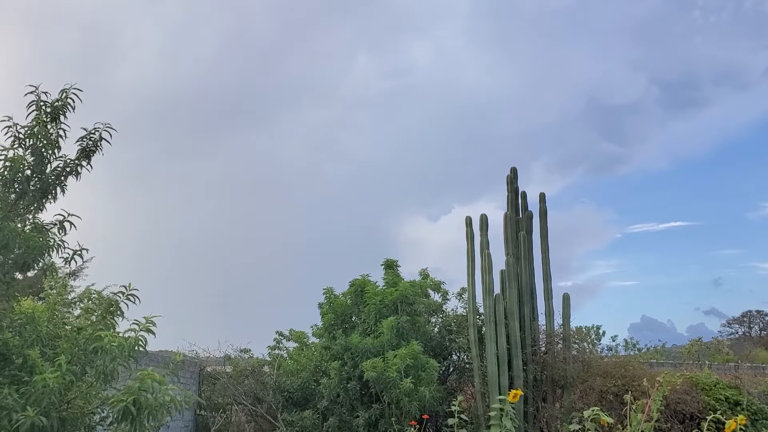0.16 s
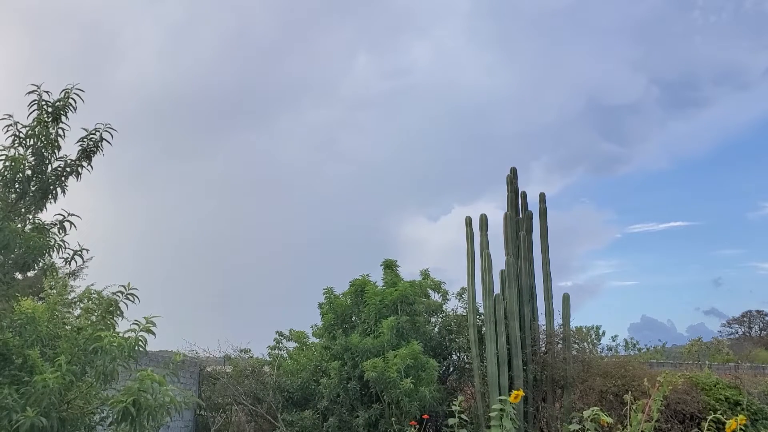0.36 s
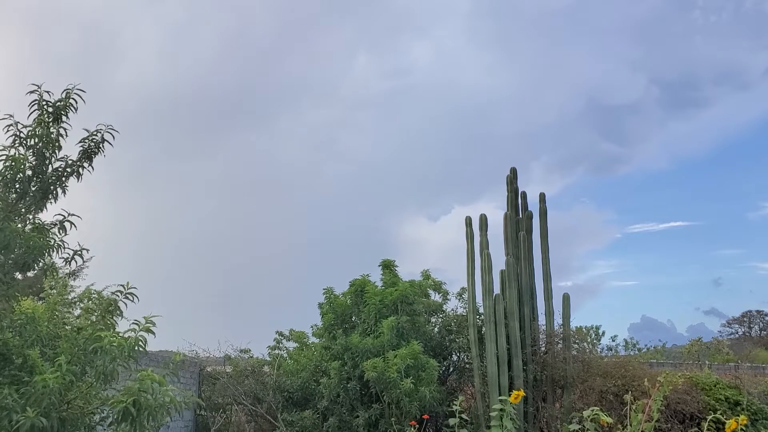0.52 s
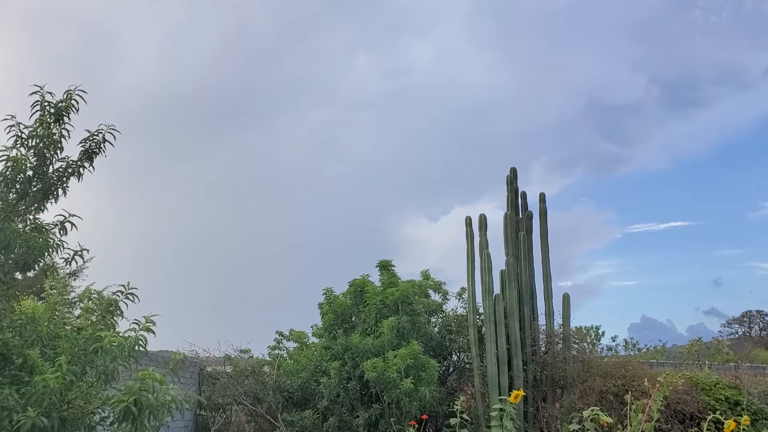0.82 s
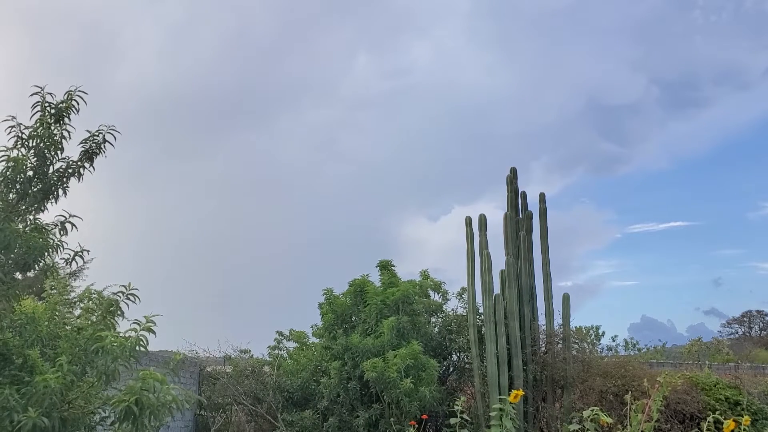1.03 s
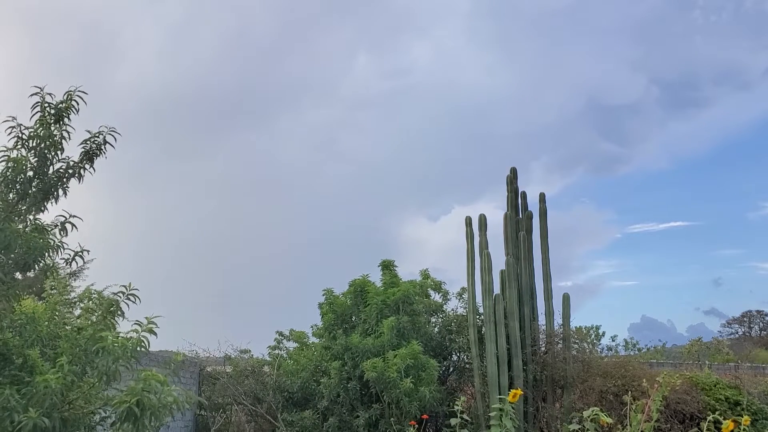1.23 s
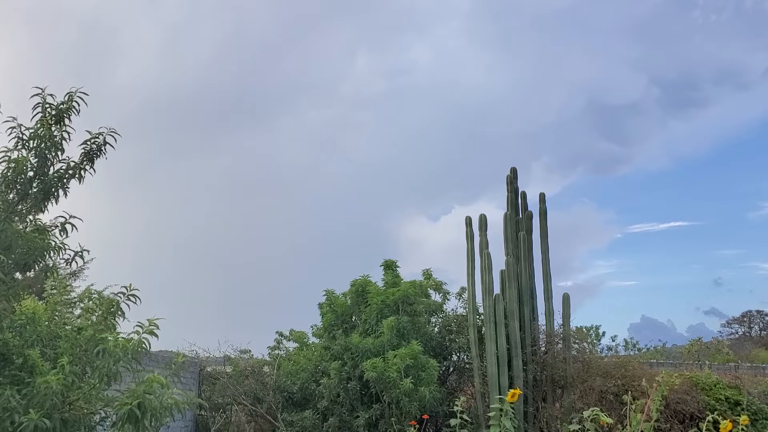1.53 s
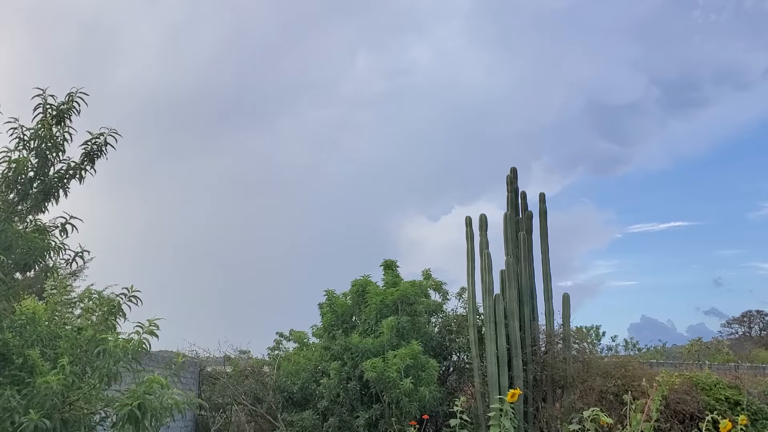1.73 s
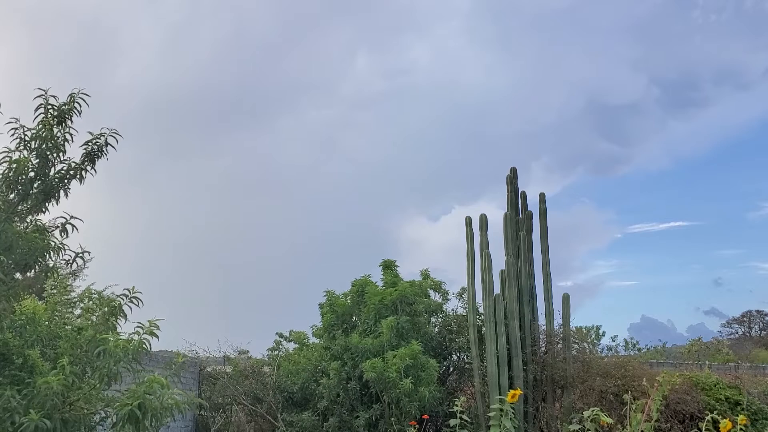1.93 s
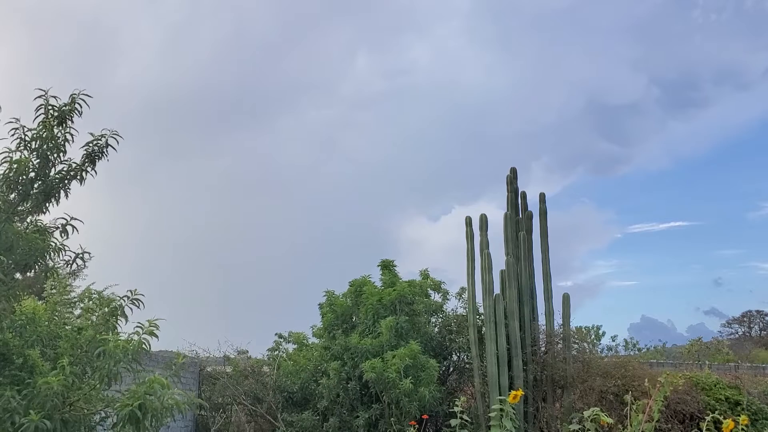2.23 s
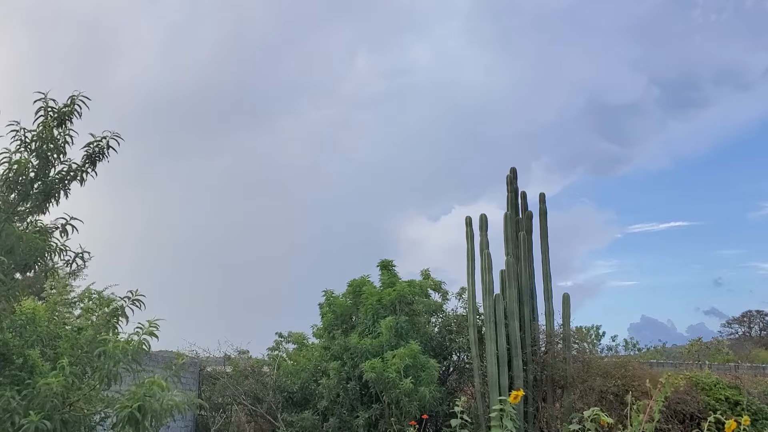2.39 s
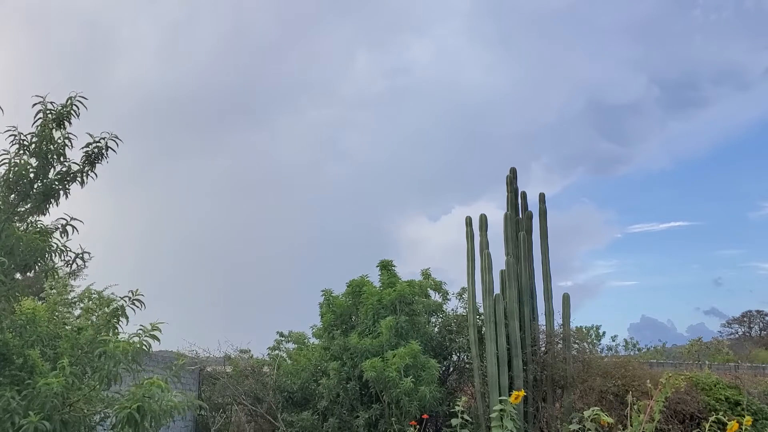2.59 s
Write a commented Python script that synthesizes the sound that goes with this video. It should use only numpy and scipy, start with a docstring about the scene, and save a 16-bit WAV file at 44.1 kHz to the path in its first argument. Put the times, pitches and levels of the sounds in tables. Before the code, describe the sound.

Deep thunder-like rumble made of dull, wind-like pressure thuds around 100 Hz, separate in each ear and heavier left. They crowd together from 0.2 to 1.5 s, hardest near 0.86 with slight crackle, then grow sparse and softer to 2.75 s. A faint far roll continues. Tiny rough bird chips come at 0-0.2, 0.4-0.5 and 1.7-1.8 s; a barely audible narrow moan at 2-2.3 s, right; faint hiss.

```python
"""Dull thuds of pressure batter each microphone port by itself, like wind on it, stronger on the left, some crackling:
a low rumble over a garden under storm clouds. Thuds are single swings of pressure; random lumps fill in the rumble.
A far roll of dull noise is partly shared by both sides. Gliding whistles make one small bird chipping rough notes
with single early echoes and a scattered one, and another farther off that sings first. A narrow moan, stronger on
the right, passes late; faint microphone hiss lies under it all."""
import sys
import numpy as np
from scipy import signal
from scipy.fft import rfft, irfft
from scipy.io import wavfile

SR = 44100
rng = np.random.default_rng(int(sys.argv[2]) if len(sys.argv) > 2 else 0)


def to_wav(s):
    """Save 16-bit WAV."""
    ch = np.atleast_2d(s).T  # columns
    pcm = np.round(np.clip(ch, -1, 1) * 32767)  # PCM
    wavfile.write(sys.argv[1], SR, pcm.astype(np.int16))


N = 121275  # samples, 2.75 s


def from_db(db):
    """Decibels to gain."""
    return 10 ** (np.asarray(db) / 20)


def rms_one(x):
    """Scales to unit rms."""
    return x / np.sqrt(np.mean(x ** 2, axis=-1, keepdims=True) + 1e-20)


def in_time(rows):
    """Columns of a curve table, one value a sample."""
    s, *columns = np.transpose(rows)
    return np.array([np.interp(np.arange(N) / SR, s, c) for c in columns])


def coloured(x, points):
    """Gives a flat signal the table's spectrum, with almost nothing below it or above it; rms 1."""
    hz, db = np.transpose(points)
    log_hz = np.log(np.maximum(np.arange(N // 2 + 1) * SR / N, 1))
    gain = from_db(np.interp(log_hz, np.log(hz), db, left=-60, right=-120))
    return rms_one(irfft(rfft(x) * gain, N))


def drift(rate_hz):
    """Random wander of rms 1: noise under a two-pole low-pass, drawn every 40 samples."""
    r = np.exp(-2 * np.pi * rate_hz * 40 / SR)
    noise = rng.standard_normal(N // 40 + 2002)
    slow = signal.lfilter([1], [1, -2 * r, r * r], noise)[2000:]  # settled part only
    return np.interp(np.arange(N) / 40, np.arange(len(slow)), rms_one(slow))


def add(out, middle, sound):
    """Mixes a short sound in, centred on a sample."""
    i = np.arange(len(sound)) + middle - len(sound) // 2
    keep = (i >= 0) & (i < N)
    out[i[keep]] += sound[keep]


def pressure_swing(t, hz, cycles_wide, flipped):
    """One swing of pressure that slows as it goes: its tail is longer and deeper than its front."""
    drag = 0.4
    cycles = hz * t * (1 - drag * np.tanh(hz * t))
    envelope = np.exp(-.5 * (cycles / cycles_wide) ** 2)
    return envelope * np.sin(2 * np.pi * cycles + np.pi * flipped)


def crackle_noise(count, length, order, band_hz):
    """Band-passed noise of rms 1, one row for each thud."""
    band = signal.butter(order, band_hz, "band", fs=SR, output="sos")
    return rms_one(signal.sosfilt(band, rng.standard_normal((count, length))))


def thuds():
    """Each thud at a port is one swing of pressure with a sharper knock and a brief, mostly dull crackle."""
    # thuds, with a few weak ones that mainly crackle: (middle [s], side [0 left, 1 right],
    # swing level before its envelope [dB], pitch at the middle [Hz], knock peak [dB],
    # dull crackle rms before its burst [dB])
    thud_rows = [(0.096, 0, -23.5, 70.4, -72.5, -94.5), (0.222, 0, -16, 122, -43, -91.5),
                 (0.252, 0, -15, 129.4, -44, -82), (0.291, 0, -11.5, 144.4, -27.5, -67),
                 (0.32, 0, -10.5, 118.9, -40.5, -78), (0.338, 0, -9, 93.2, -49.5, -68),
                 (0.363, 1, -18, 93, -37.5, -96.5), (0.384, 1, -19, 106, -42, -76.5),
                 (0.418, 0, -14, 112.2, -43, -78), (0.445, 0, -8.5, 107.7, -33, -81),
                 (0.463, 0, -11, 125, -41.5, -82), (0.467, 1, -21.5, 86, -63, -82.5),
                 (0.504, 0, -19, 93.3, -56, -82.5), (0.514, 1, -16, 103.7, -62, -85),
                 (0.547, 0, -17, 93, -55, -83.5), (0.603, 0, -10.5, 145.3, -26.5, -76),
                 (0.678, 1, -17.5, 87.3, -59, -89.5), (0.739, 0, -13.5, 89.3, -47, -79.5),
                 (0.808, 0, -17, 103.5, -41.5, -86), (0.828, 0, -15, 132.4, -36.5, -72),
                 (0.826, 1, -22, 96.7, -64, -74.5), (0.857, 0, -4.5, 119.3, -30, -60),
                 (0.872, 0, -15, 66.2, -48.5, -73), (0.899, 0, -36, 90, -47.5, -75.5),
                 (0.973, 1, -15.5, 102, -50.5, -79), (0.987, 0, -15, 104, -53, -80.5),
                 (1.021, 0, -10.5, 119, -32.5, -52), (1.041, 0, -15.5, 87, -38.5, -65),
                 (1.082, 1, -22.5, 95, -55, -71), (1.09, 0, -30.5, 97.2, -48, -65),
                 (1.111, 0, -19, 118, -39, -66), (1.14, 0, -23, 95, -36, -80),
                 (1.197, 0, -18, 109, -37, -77.5), (1.267, 0, -10.5, 105, -39.5, -51),
                 (1.293, 0, -22.5, 97, -52, -73), (1.422, 0, -16.5, 89.3, -43, -75),
                 (1.442, 0, -11.5, 139.7, -33.5, -76.5), (1.471, 0, -18, 81.3, -49.5, -74),
                 (1.485, 0, -17, 135.4, -56.5, -82), (1.503, 0, -20.5, 93.6, -61, -80.5),
                 (1.616, 0, -15, 127.6, -39.5, -80), (1.706, 0, -21, 77, -59, -77),
                 (1.728, 0, -21.5, 85, -56, -82), (1.909, 1, -24.5, 84, -60, -81.5),
                 (1.963, 0, -21.5, 90.6, -51, -93.5), (2.031, 0, -19.5, 104.3, -45.5, -78.5),
                 (2.281, 0, -22.5, 62.4, -74, -74), (2.314, 0, -16.5, 83.5, -74, -73),
                 (2.499, 0, -19.5, 110.3, -56, -73), (2.639, 1, -29, 90, -71, -70)]
    knock_hz, knock_s = 314, 0.0016
    crackle_s, crackle_rise_s, crackle_lead_s = .0075, .0012, .005
    sharp_db = -21  # sharp crackle relative to the dull
    snap_db = -62   # the hardest thuds snap: sharp noise grows three times as fast as their level in dB
    out, t = np.zeros((2, N)), np.arange(-2000, 2001) / SR
    dulls = crackle_noise(len(thud_rows), len(t), 3, [460, 900])
    sharps = crackle_noise(len(thud_rows), len(t), 1, [900, 2500])
    since = t + crackle_lead_s
    # sudden front, longer tail
    burst = np.exp(-.5 * (since / crackle_s) ** 2) / (1 + np.exp(-since / crackle_rise_s))
    for (s, side, db, hz, knock_db, crackle_db), dull, sharp in zip(thud_rows, dulls, sharps):
        cycles_wide = .55 if s > 1.8 else .36  # the last thuds ring on for more of a cycle
        swing = from_db(db) * pressure_swing(t, hz, cycles_wide, rng.random() > .5)
        knock_wave = np.sin(2 * np.pi * (knock_hz * t + rng.random()))
        knock = from_db(knock_db) / np.cosh(t / knock_s) * knock_wave
        sharp_gain = from_db(crackle_db + sharp_db) + from_db(snap_db + 3 * db)
        crackle = (from_db(crackle_db) * dull + sharp_gain * sharp) * burst
        add(out[int(round(side))], int(s * SR), swing + knock + crackle)
    return out


def port_rumble(colour, lumps_per_s, spread_db, patchy_db):
    """Sparse random lumps of pressure at one port, run together by their low colour."""
    size_db = spread_db * np.minimum(rng.exponential(1, N), 3) + patchy_db * drift(10)
    lumps = from_db(size_db) * rng.choice([-1, 1], N)
    present = rng.random(N) < lumps_per_s / SR
    return coloured(lumps * present, colour)


def rumble():
    """Lumps of pressure, unrelated at the two ports, fill the space between thuds."""
    # spectrum at each port: (frequency [Hz], relative density [dB per Hz])
    left_colour = [(20, -29), (30, -11), (45, -4.5), (65, 3), (90, -4), (130, -20), (180, -11.5),
                   (250, -22.5), (350, -39), (500, -49), (800, -72.5)]
    right_colour = [(20, -24), (30, -15), (45, -6), (65, -.5), (90, 0), (130, -7), (180, -16), (250, -25),
                    (350, -37), (500, -48), (800, -70)]
    # rumble between thuds, before the trim: (time [s], left level [dB], right level [dB])
    levels = [(0.0, -35.5, -38), (0.11, -37, -32), (0.22, -28, -33), (0.33, -25, -33.5), (0.44, -23.5, -32),
              (0.55, -26, -38.5), (0.66, -34.5, -30), (0.77, -39.5, -33), (0.88, -42.5, -30.5),
              (0.99, -24, -35.5), (1.1, -25.5, -31.5), (1.21, -31.5, -31.5), (1.32, -29.5, -31.5),
              (1.43, -25, -37), (1.54, -37.5, -38.5), (1.65, -36, -39), (1.76, -30.5, -40.5),
              (1.87, -42, -32.5), (1.98, -39, -33.5), (2.09, -40.5, -34), (2.2, -37.5, -34.5),
              (2.31, -38.5, -37), (2.42, -45, -33.5), (2.53, -44.5, -38), (2.64, -36, -34.5),
              (2.75, -46, -43.5)]
    trim_db = 1
    left = port_rumble(left_colour, lumps_per_s=450, spread_db=1.5, patchy_db=1.0)
    right = port_rumble(right_colour, lumps_per_s=700, spread_db=1.2, patchy_db=.6)
    return np.array([left, right]) * from_db(in_time(levels) + trim_db)


def birds():
    """Gliding whistles, notes and early echoes alike; roughness flutters level and pitch; the garden echoes."""
    # bird notes and their single early echoes: (middle [s], glide length [s], start [Hz], end [Hz],
    # level before fades and flutter [dB], roughness [0-1])
    whistles = [(.015, .025, 2450, 2750, -71, .4), (.004, 0.022, 2930, 2834, -66, 0.77),
                (0.034, 0.041, 2880, 2935, -69.5, 0.65), (.075, .03, 4000, 3980, -75, .3),
                (.085, .016, 4200, 4670, -70.5, .15), (.115, .04, 4200, 4340, -77, .5),
                (.125, .045, 4650, 4650, -82, .3), (0.126, 0.033, 3620, 3100, -70, .2),
                (0.15, 0.04, 3110, 2350, -67, .15), (0.093, 0.034, 3270, 3000, -71.5, .6),
                (0.161, .025, 3350, 3250, -80, .5), (.195, .04, 2150, 2120, -81.5, .2),
                (.185, .035, 2800, 2736, -70.5, .7), (.25, .09, 4100, 3900, -81.5, 0.8),
                (.393, .014, 4600, 4565, -75, .6), (.415, .015, 3850, 3900, -61.5, .1),
                (.425, .009, 3920, 3990, -51.5, .15), (.432, .008, 3680, 3370, -64, .1),
                (.45, .009, 3950, 4000, -63.5, .2), (.477, .013, 3120, 3394, -55, .1),
                (.492, 0.013, 3120, 2690, -63.5, .1), (0.517, .04, 3450, 3150, -76, .9),
                (.505, .012, 3200, 3335, -68, .3), (.452, .03, 3600, 3340, -67.5, .6),
                (.458, .012, 4560, 4560, -74.5, .5), (.587, .02, 3250, 3202, -82, .5),
                (1.035, .042, 3910, 3805, -82.5, .5), (1.559, .013, 4180, 4130, -75.5, .35),
                (1.625, .018, 4080, 4200, -73, .9), (1.687, .012, 4700, 4700, -76, .3),
                (1.706, .011, 3860, 3860, -63, .1), (1.715, .008, 3950, 3960, -53.5, .15),
                (1.726, 0.0054, 4140, 3950, -67, 0.28), (1.737, .014, 3850, 4030, -59.5, .2),
                (1.762, 0.038, 3620, 2900, -70.5, .7), (1.775, .04, 3800, 3520, -76.5, .9),
                (1.755, .012, 4100, 4000, -76.5, .5), (1.802, .018, 3350, 3180, -65, .4),
                (1.807, .025, 3980, 4070, -78.5, .4)]
    flutter_hz, spread_hz = 400, 160
    song = np.zeros(N)
    slow = signal.butter(2, flutter_hz, fs=SR, output="sos")
    flutter = rms_one(signal.sosfilt(slow, rng.standard_normal((len(whistles), 2, SR // 4))))
    for (s, length, start_hz, end_hz, db, rough), (swell, waver) in zip(whistles, flutter):
        # the faded whistle lasts half as long again as its glide length, and glides on at both ends
        u = np.arange(int(1.5 * length * SR)) / (length * SR) - .75
        glide_hz = (start_hz + end_hz) / 2 + (end_hz - start_hz) * u
        hz = glide_hz + rough * spread_hz * waver[:len(u)]
        level = from_db(db) * np.hanning(len(u)) * (1 + rough * swell[:len(u)])
        add(song, int(s * SR), level * np.sin(2 * np.pi * np.cumsum(hz) / SR))
    lag_s, pan_db = .0005, .4  # the left hears it later, and slightly louder
    late = np.roll(song, round(lag_s * SR))
    direct = np.array([late * from_db(pan_db), song * from_db(-pan_db)])
    return direct + garden_echo(song)


def garden_echo(song):
    """Decaying noise tails, different left and right, scatter the song."""
    t60_s, rise_s, echo_db, blur_hz = .4, .012, -10, 120
    far_until_s, far_db = .3, 6  # the farther bird sings first and returns more echo
    sent = song * from_db(far_db * (np.arange(N) / SR < far_until_s))
    t = np.arange(SR // 2) / SR
    decay = from_db(-60 * t / t60_s) * np.minimum(t / rise_s, 1)
    tails = rms_one(rng.standard_normal((2, len(t))) * decay) / np.sqrt(len(t))
    echo = signal.fftconvolve(sent[None], tails, axes=1)[:, :N]
    # random swells, as of swaying leaves, blur its pitch
    return from_db(echo_db) * echo * [drift(blur_hz), drift(blur_hz)]


def far_roll():
    """Dull, unsteady noise from the sky, partly the same left and right."""
    # spectrum of the far roll: (frequency [Hz], relative density [dB per Hz])
    colour = [(150, -18.5), (300, 6), (500, -4), (700, -12), (1000, -29.5), (1500, -31.5)]
    # far roll before the trim and the stereo mix: (time [s], level [dB])
    levels = [(0.03, -74.5), (0.46, -76.5), (0.67, -80), (1.01, -74.5), (1.67, -78.5), (2.17, -75),
              (2.3, -78.5), (2.75, -78.5)]
    trim_db, alike = 6, 0.19  # alike: correlation of left with right
    mid = coloured(rng.standard_normal(N) * from_db(0.55 * drift(3.4)), colour)
    side = coloured(rng.standard_normal(N) * from_db(0.55 * drift(3.4)), colour)
    stereo = np.sqrt(1 + alike) * mid + np.sqrt(1 - alike) * side * [[1], [-1]]
    return from_db(in_time(levels) + trim_db) * stereo


def moan():
    """Noise through a narrow resonance, heard 5 dB weaker on the left."""
    # moan at the right: (time [s], level [dB])
    levels = [(1.9, -100), (1.98, -76.5), (2.12, -81.5), (2.28, -83.5), (2.33, -100)]
    centre_hz, width_hz = 688, 66
    edges_hz = [centre_hz - width_hz / 2, centre_hz + width_hz / 2]
    band = signal.butter(2, edges_hz, "band", fs=SR, output="sos")
    tone = rms_one(signal.sosfilt(band, rng.standard_normal(N)))
    return from_db(in_time(levels) + [[-5], [0]]) * tone


def hiss():
    """Steady unrelated noise in each channel, strongest near 1 kHz and again at the very top."""
    # garden air and microphone hiss: (frequency [Hz], relative density [dB per Hz])
    colour = [(530, -31.5), (900, -2.5), (1010, -4.5), (1660, -7), (2910, -11), (3200, -9), (4420, -9),
              (5610, -14.5), (8630, -20), (13600, -8.5), (15700, -3.5)]
    left = coloured(rng.standard_normal(N), colour)
    right = coloured(rng.standard_normal(N), colour)
    return np.array([from_db(-78.5) * left, from_db(-77.5) * right])


def scene():
    """All sources together."""
    return thuds() + rumble() + birds() + far_roll() + moan() + hiss()


def record(dry):
    """The microphone loses the deepest bass; the top is cut steeply."""
    mic_low_hz, cutoff_hz = 33, 15720
    bass_cut = signal.butter(3, mic_low_hz, "high", fs=SR, output="sos")
    top_cut = signal.ellip(12, .3, 80, cutoff_hz, fs=SR, output="sos")  # .3 dB ripple, 80 dB down
    return signal.sosfilt(top_cut, signal.sosfilt(bass_cut, dry))


dry = scene()
out = record(dry)
to_wav(out)
```